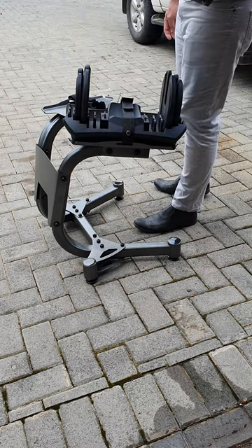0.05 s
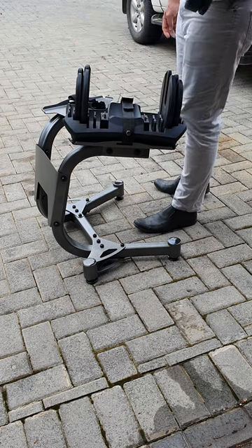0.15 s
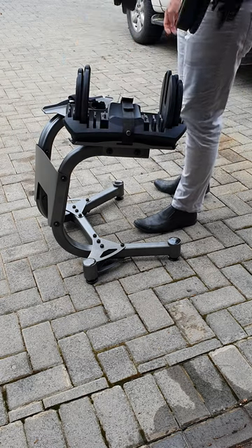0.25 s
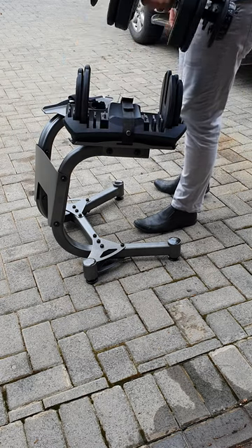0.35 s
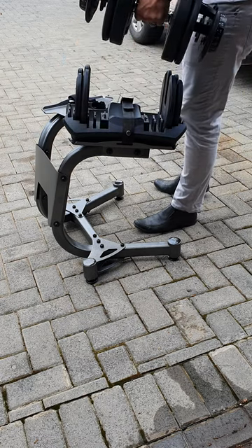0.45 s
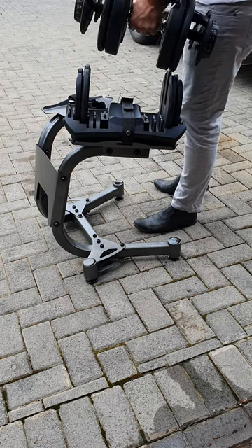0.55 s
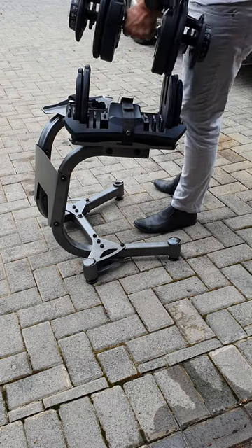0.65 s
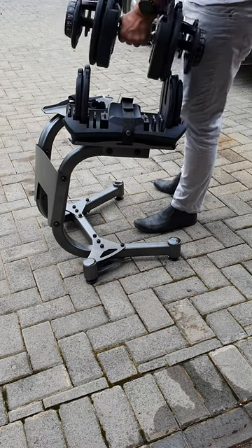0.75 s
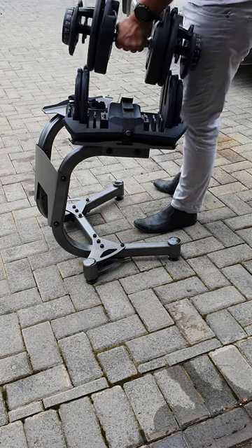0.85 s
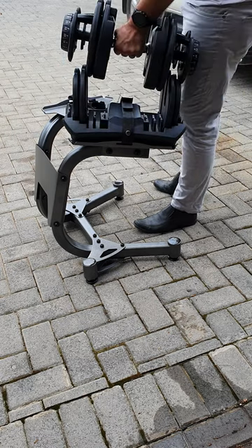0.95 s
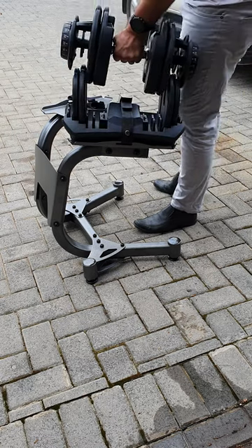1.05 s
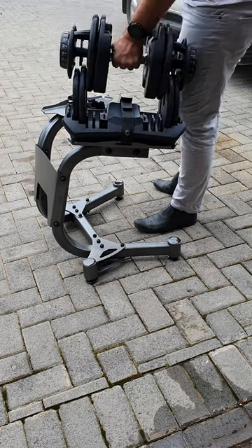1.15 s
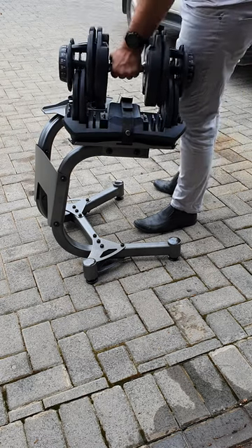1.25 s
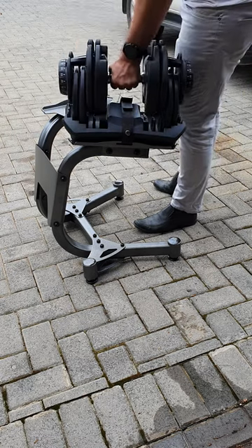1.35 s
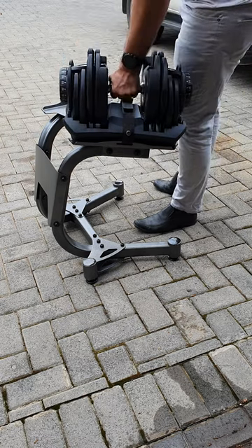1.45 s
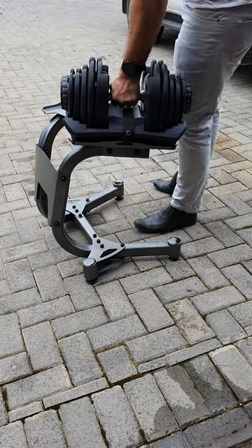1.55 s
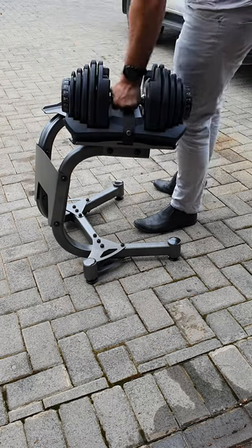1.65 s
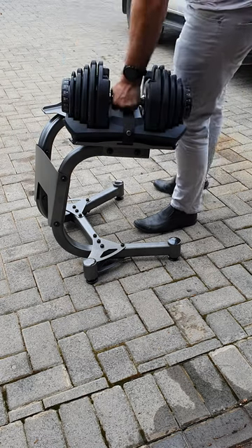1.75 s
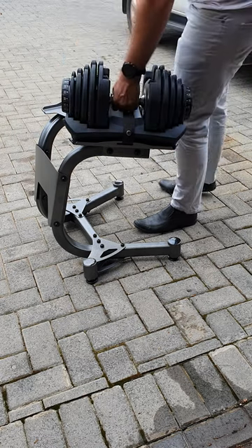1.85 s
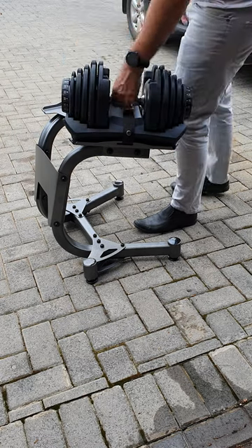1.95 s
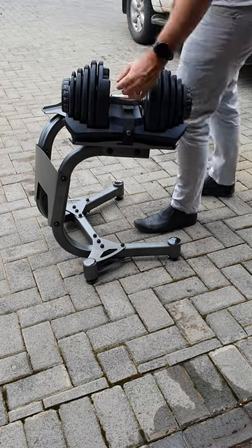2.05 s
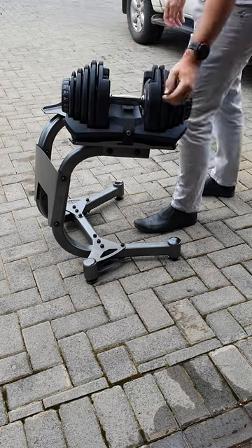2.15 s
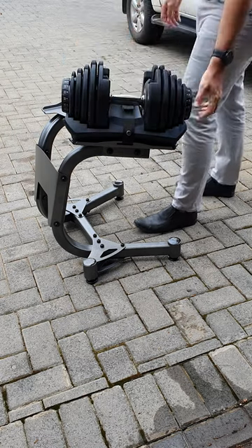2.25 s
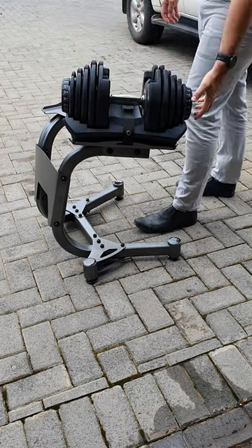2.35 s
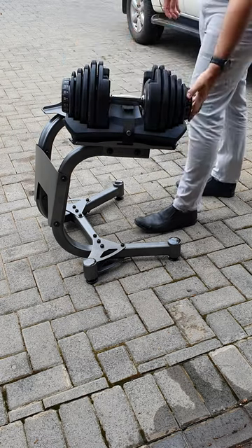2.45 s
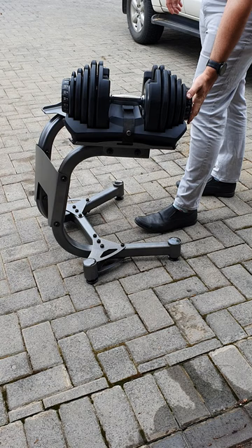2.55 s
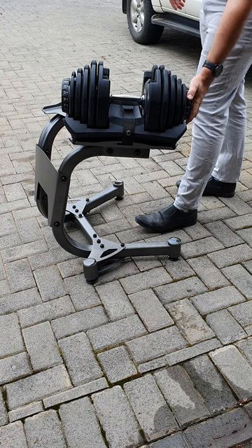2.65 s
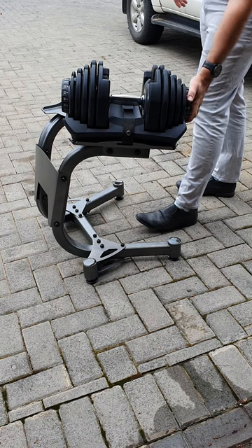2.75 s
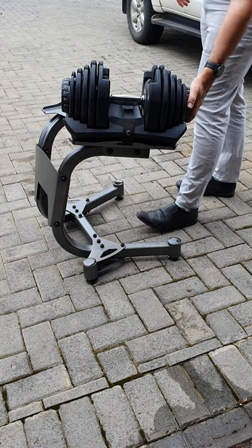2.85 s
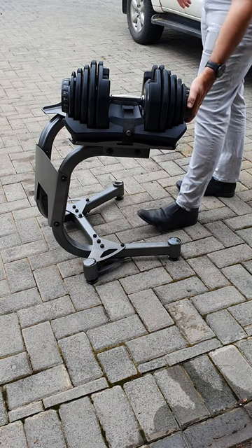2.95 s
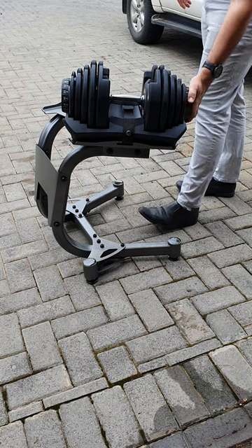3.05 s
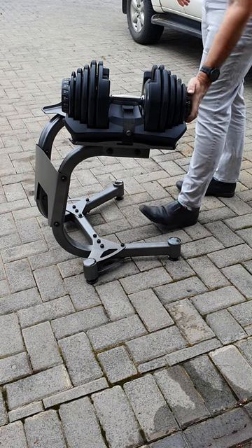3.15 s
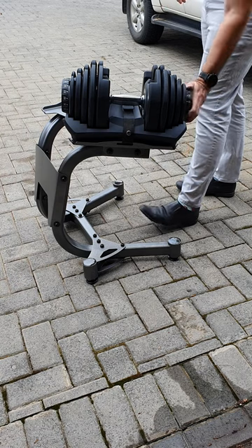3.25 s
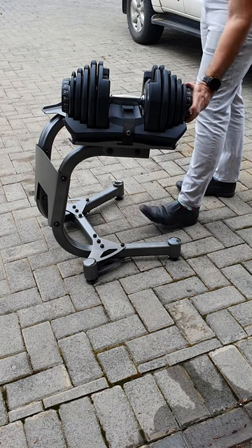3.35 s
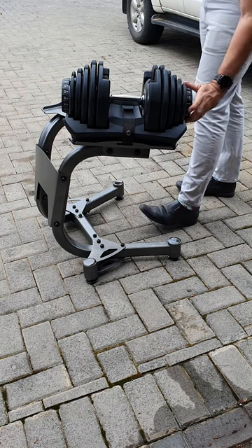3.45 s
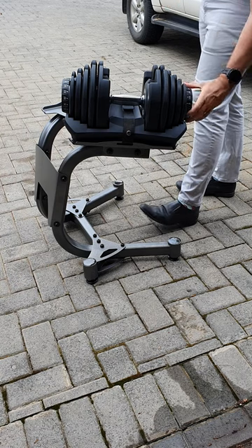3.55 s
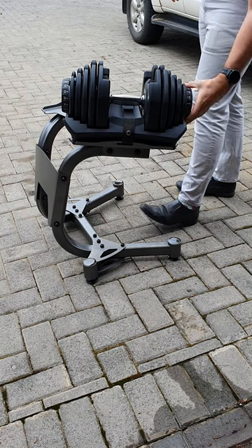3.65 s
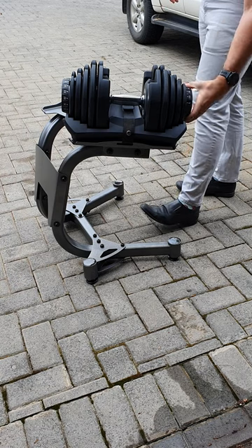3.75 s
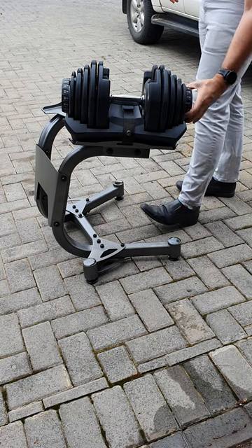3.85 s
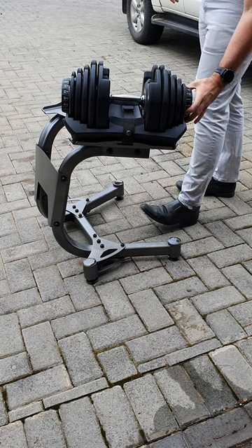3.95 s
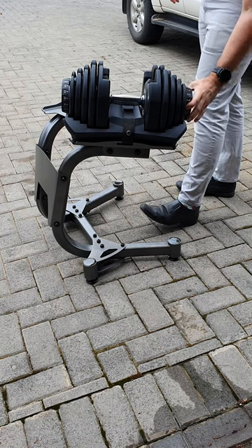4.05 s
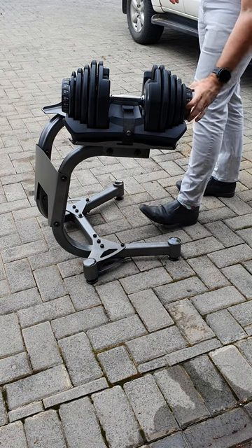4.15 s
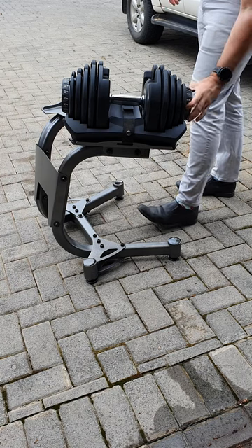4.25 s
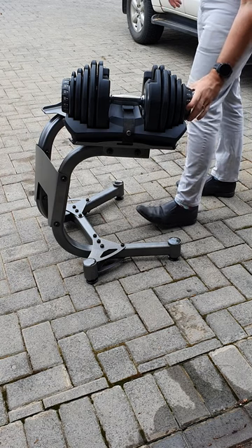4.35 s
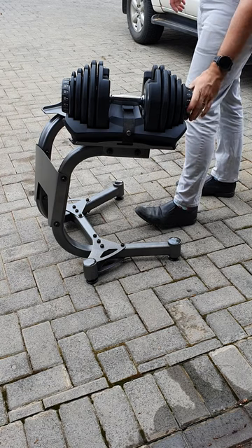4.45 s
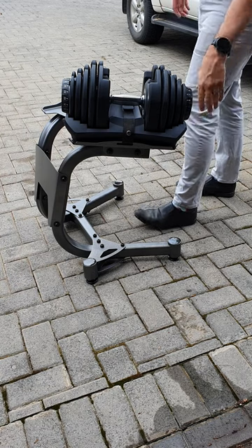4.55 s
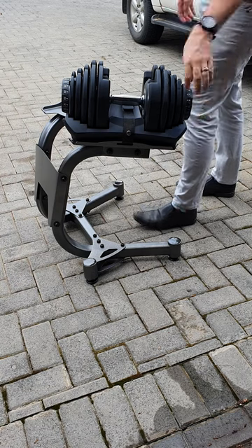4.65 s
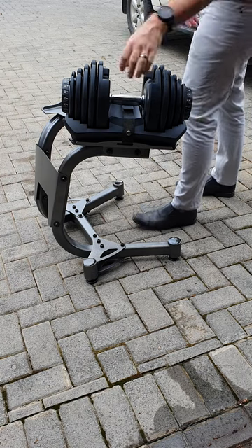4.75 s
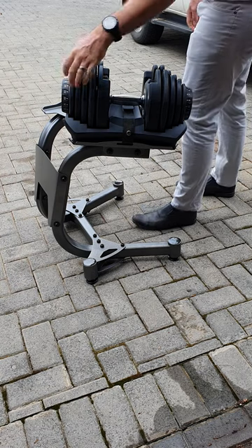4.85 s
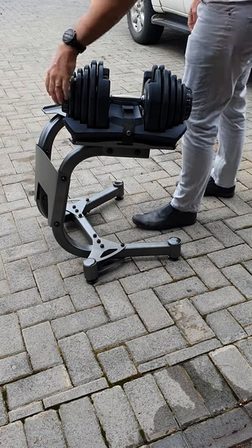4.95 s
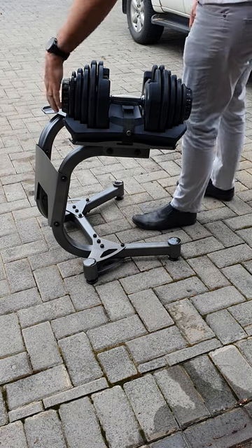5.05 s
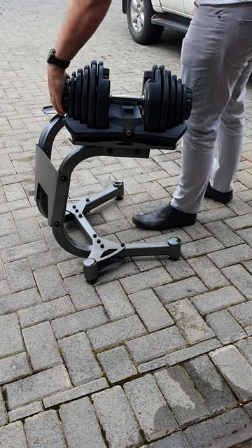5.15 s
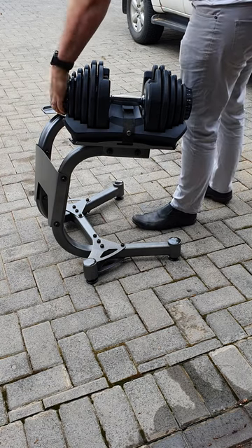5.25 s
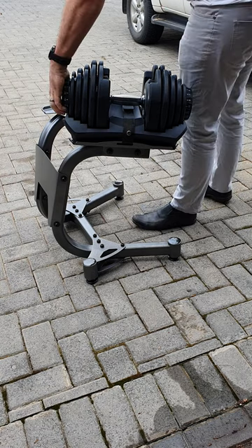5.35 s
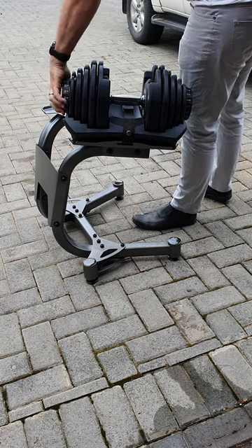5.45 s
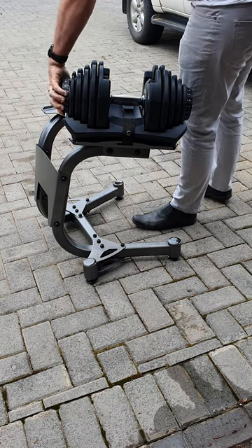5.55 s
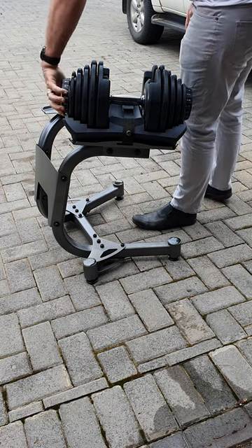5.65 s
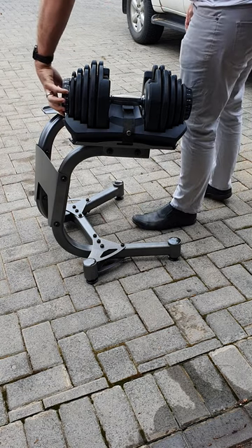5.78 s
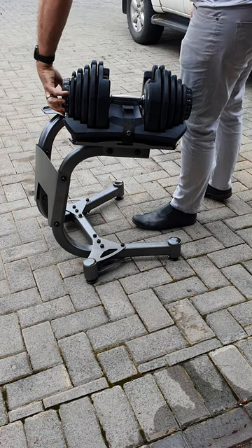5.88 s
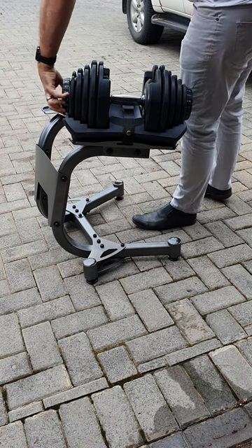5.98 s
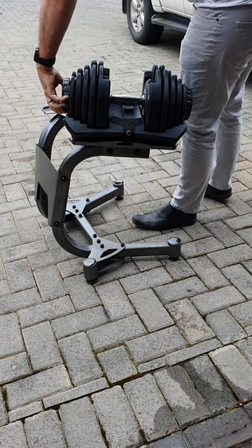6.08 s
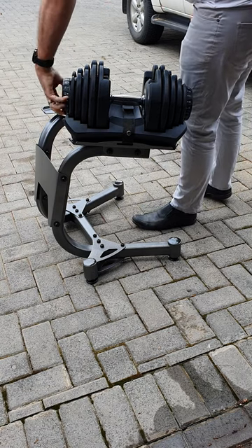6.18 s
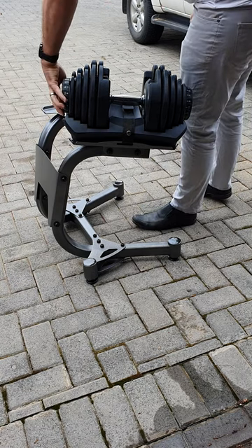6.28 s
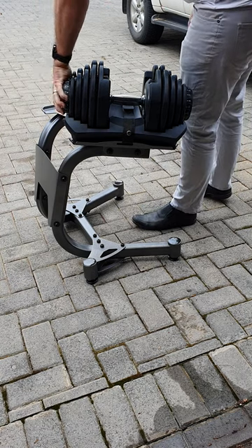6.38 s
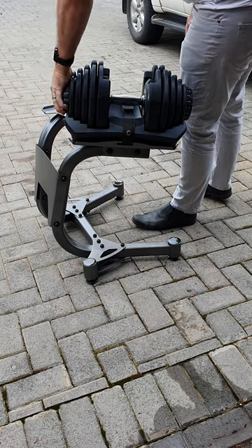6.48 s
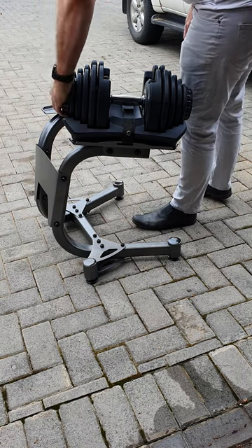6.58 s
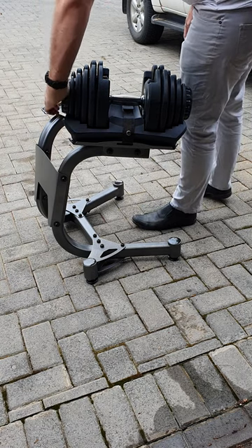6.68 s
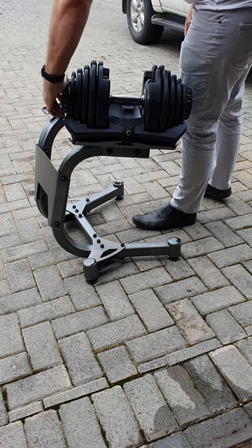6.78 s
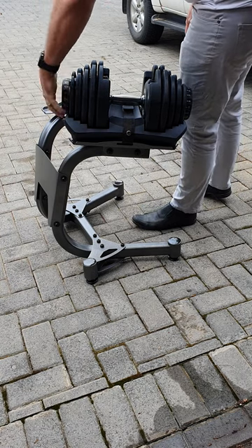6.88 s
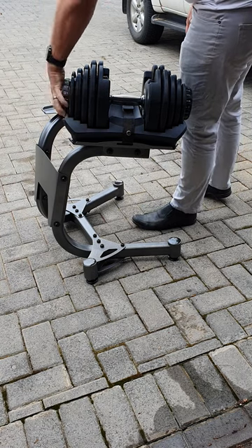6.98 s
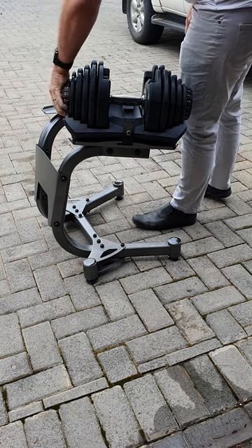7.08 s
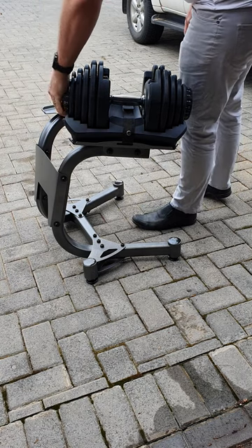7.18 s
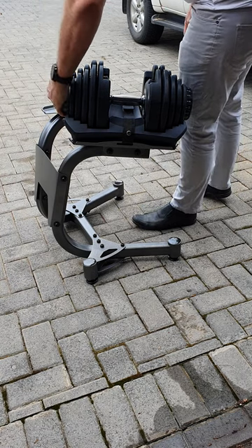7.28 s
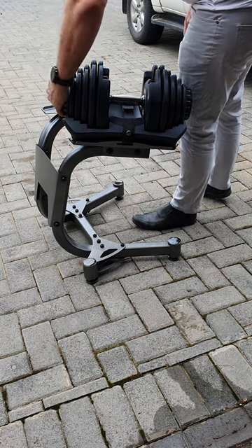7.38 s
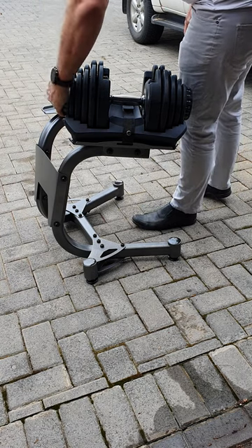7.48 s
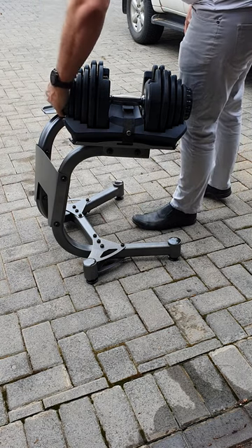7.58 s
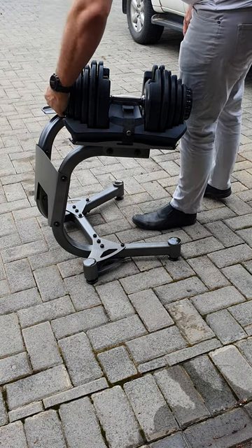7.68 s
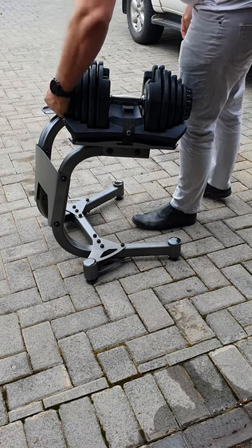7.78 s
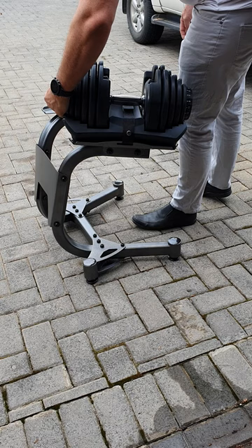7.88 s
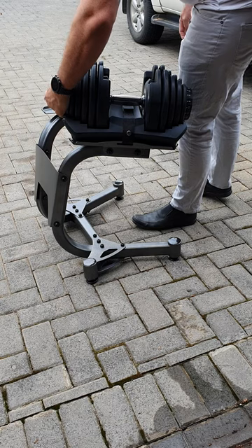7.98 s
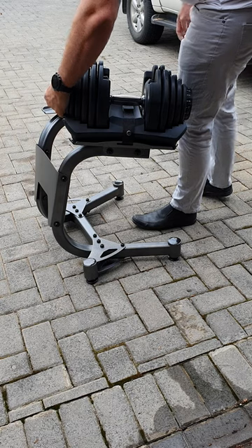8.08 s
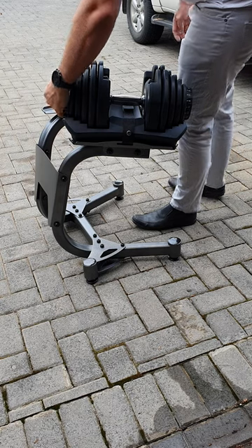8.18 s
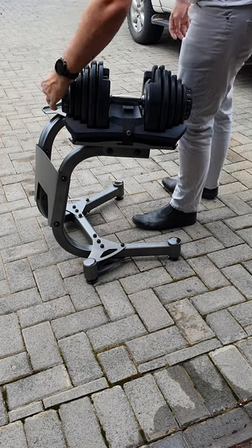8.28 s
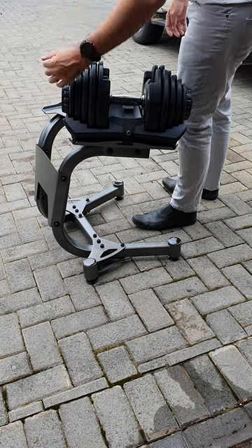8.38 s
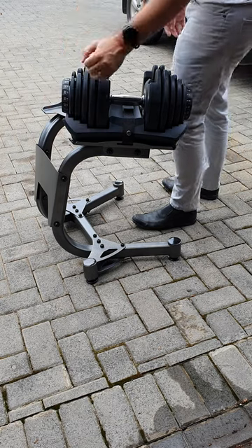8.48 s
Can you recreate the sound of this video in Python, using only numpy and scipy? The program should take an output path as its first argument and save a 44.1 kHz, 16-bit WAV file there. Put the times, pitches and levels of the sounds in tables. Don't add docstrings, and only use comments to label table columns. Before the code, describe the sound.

Outdoors in a paved yard, heavy steel plates touch, rattle, then crash into a tray with a dense clanging and a booming metal stand. Shoes scuff softly. A hand then turns a hollow plastic dial in light clicks, pauses, and turns the other with louder snaps and a brief squeak. Close stereo pickup, short wall reflections, faint city hiss and distant engine drone.

```python
import sys
import numpy as np
from scipy import signal
from scipy.fft import rfft, irfft
from scipy.io import wavfile
from scipy.ndimage import uniform_filter1d

SR = 44100
rng = np.random.default_rng(int(sys.argv[2]) if len(sys.argv) > 2 else 0)


def unload_wav(signal):
    wavfile.write(
        sys.argv[1],
        SR,
        np.round(np.clip(np.atleast_2d(signal).T, -1, 1) * 32767).astype(np.int16),
    )


def voltage_ratio(level):
    return 10 ** (np.asarray(level, float) / 20)


N = 375732
MIC_LAG = 14


def evened(x):
    return x / np.sqrt(np.mean(x ** 2) + 1e-20)


def read(points, hz):
    f, value = np.transpose(points)
    return np.interp(np.log(hz + 1), np.log(f + 1), value)


def add(mix, start_s, sound):
    part = mix[..., round(start_s * SR):][..., :sound.shape[-1]]
    part += sound[..., :part.shape[-1]]


def columns(rows):
    s, *controls = np.transpose(rows)
    t = np.arange(s[0], s[-1], 1 / SR)
    return s[0], [np.interp(t, s, c) for c in controls]


def drift(count, *smoothing):
    x = rng.standard_normal(count)
    for samples in smoothing:
        x = uniform_filter1d(x, samples)
    return evened(x)


def colour(x, spectrum):
    hz = np.fft.rfftfreq(len(x), 1 / SR)
    return evened(irfft(rfft(x) * voltage_ratio(read(spectrum, hz)), len(x)))


def resonate(x, hz, width_hz):
    turn = np.exp(2j * np.pi * np.cumsum(hz * np.ones(len(x))) / SR)
    r = np.exp(-np.pi * width_hz / SR)
    return evened((turn * signal.lfilter([1 - r], [1, -r], x / turn + 1e-18)).real)


def resonate_twice(x, hz, width_hz):
    return resonate(resonate(x, hz, width_hz), hz, width_hz)


def ring(modes, seconds, scatter_db=0., detune=0.):
    hz, db, t60 = np.transpose(modes)[:, :, None]
    luck = rng.standard_normal((2, len(modes), 1))
    t = (np.arange(int(seconds * SR)) / SR).astype("f")
    loss = (np.log(1000) / t60).astype("f")
    spin = (2 * np.pi * hz * (1 + detune * luck[1])).astype("f")
    x = voltage_ratio(db + scatter_db * luck[0])[:, 0] @ (np.exp(-loss * t) * np.sin(spin * t))
    return x / abs(x).max()


def softened(x, rise_s):
    return x * np.minimum(np.arange(len(x)) / SR / rise_s, 1)


def flutter(x, depth):
    return x * (1 + depth * drift(len(x), 120))


def grit(count, per_s, spread_db):
    size = voltage_ratio(spread_db * np.minimum(rng.exponential(1, count), 4))
    sign = rng.choice([-1, 1], count)
    return evened(size * sign * (rng.random(count) < per_s / SR))


def strokes(t, at, rise, hold, db, fall_db_per_s):
    coarse = t[::20]
    since = coarse - np.c_[at]
    rising_db = np.minimum(30 * since / np.c_[rise], 0)
    falling_db = fall_db_per_s * np.maximum(since - np.c_[hold], 0)
    level = voltage_ratio(np.c_[db] + rising_db - falling_db) * (since > -1.5 * np.c_[rise])
    return np.interp(t, coarse, level.sum(0))


def placed(x, spread_db=4.5, count=7):
    side = rng.uniform(-1, 1)
    return voltage_ratio([[spread_db * side], [-spread_db * side]]) * np.array([x, np.roll(x, round(count * side))])


# pitch_hz, level_db (per Hz)
PLATE_COLOUR = [(35, -43), (60, -27.5), (274, 1), (346, -9), (527, 2.5), (862, -5), (924, -2), (1510, 2),
                (1850, -10.5), (2840, -16.5), (4120, -19), (7400, -59), (13600, -49), (15000, -56.5),
                (15800, -80)]
# pitch_hz, t60_s
PLATE_T60 = [(80, .14), (500, 0.045), (2000, 0.035), (10000, 0.072)]


def plate_body():
    hz = 95 * (14500 / 95) ** (rng.random(300) ** 0.55)
    t60 = read(PLATE_T60, hz)
    db = read(PLATE_COLOUR, hz) + 3 * np.log2(hz / 1000) - 10 * np.log10(t60)
    modes = np.transpose([hz, db, t60])
    return ring(modes[hz < 2000], .2), ring(modes[hz >= 2000], 0.086)


# contact_s, rise_s, hold_s, low_level_db, treble_relative_db
RATTLE = [
    (0.839, .006, 0.039, -38, -8),
    (1.046, .05, .03, -67, 3.5),
    (1.2, 0.064, 0.0032, -43, -1.5),
    (1.281, 0.0091, 0.0046, -44, -3),
    (1.362, 0.017, 0.037, -54.5, 4.5),
    (1.414, .004, 0.015, -25, -12.5),
    (1.457, 0.032, .08, -29.5, -1.5),
    (1.585, 0.003, 0.0051, -19.5, -11.5),
    (1.603, 0.025, 0.02, -23.5, -1),
    (1.984, 0.041, 0.015, -64, 4.5),
]
RATTLE_SPAN_S = .8, 2.2
# start_s, peak_db, treble_relative_db
KNOCKS = [(0.842, -17, -24), (0.872, -20, -21.5), (1.152, -32.5, -18), (1.19, -34.5, -13.5),
          (1.2, -31, -13), (1.302, -33.5, -15), (1.323, -37, -17), (1.457, -10, -16), (1.48, -7.5, -16.5),
          (1.498, -13, -15), (1.518, -8.5, -16.5), (1.534, -10.5, -12.5), (1.553, -16, -13.5),
          (1.608, -8, -15.5), (1.632, -9, -16.5), (1.646, -14, -17.5), (1.659, -11, -17),
          (1.686, -14, -18.5), (1.717, -15.5, -17.5), (1.753, -20.5, -26.5), (1.799, -24.5, -41),
          (1.286, -44.5, -24), (1.365, -43, -17), (1.419, -15.5, -17), (1.438, -4.5, -29),
          (1.583, -1.5, -20), (1.599, -10.5, -19.5), (1.615, -10.5, -5.5), (1.853, -24, -25.5)]
# pitch_hz, level_db, t60_s
STAND = [(102, -13, 1), (279.6, -7.5, 0.63), (451.3, -10, 0.25), (622, -4, 0.2), (659.4, 1.5, 0.49),
         (695, 5, 0.5), (757, 0, 0.39), (784, -4.5, 0.76), (870, -6.5, 0.6), (1055, -21, 0.97)]


def dumbbell():
    out = np.zeros((2, N))
    t = np.arange(*RATTLE_SPAN_S, 1 / SR)
    at, rise, hold, low_db, treble_db = np.transpose(RATTLE)

    def shaking(db, fall_db_per_s, settle_fall_db_per_s):
        contact = strokes(t, at, rise, hold, db, fall_db_per_s)
        return contact + strokes(t, at, rise, hold, db - 11, settle_fall_db_per_s)

    deep = shaking(low_db, 278, 112)
    bright = shaking(low_db + treble_db, 341.5, 250)
    for _ in range(7):
        drive = grit(len(t), per_s=450, spread_db=2.8)
        low, high = (evened(signal.oaconvolve(drive, body)[:len(t)]) for body in plate_body())
        add(out, t[0], placed(voltage_ratio(-11.5) * deep * low, spread_db=0.3, count=4))
        add(out, t[0], placed(voltage_ratio(-14.5) * bright * high))
    for s, peak_db, knock_treble_db in KNOCKS:
        low, high = plate_body()
        add(out, s, voltage_ratio(peak_db - 0.5) * softened(low, rise_s=0.00075)[None])
        add(out, s, placed(voltage_ratio(peak_db + knock_treble_db - 2.5) * high))
    stand = ring(STAND, 1.5)
    hum = signal.oaconvolve(out, stand[None] / np.linalg.norm(stand), axes=1)[:, :N]
    out += voltage_ratio(-21.5) * hum * (1 + 0.75 * drift(N, 300))
    return out * voltage_ratio([[-.3], [.3]])


# start_s, level_db
TRAY_BLOWS = [
    (1.42, -28.5),
    (1.52, -28),
    (1.586, -20.5),
    (1.62, -20.5),
    (1.72, -26),
    (1.752, -29.5),
    (1.8, -29.5),
    (1.851, -35),
]
# pitch_hz, level_db, t60_s
TRAY = [(304, -9, 0.17), (374.3, -8, 0.23), (441, -6.5, .2), (527, -3.5, .33), (566, -2.5, 0.27),
        (617, 0.5, .36), (637, -1.5, .36), (721, 2, .4), (791, -2, .3), (883, -3.5, 0.28), (1080, -5.5, .2),
        (1314, -10.5, .2), (1597, -9.5, 0.29)]


def tray_booms(near):
    for s, db in TRAY_BLOWS:
        boom = flutter(ring(TRAY, .7, scatter_db=4.5, detune=.012), depth=.6)
        add(near, s, voltage_ratio(db) * placed(softened(boom, rise_s=.004), spread_db=1.0, count=2))


# start_s, pitch_hz, level_db, t60_s
THUDS = [
    (0.845, 193, -38.5, 0.27),
    (0.85, 129.6, -44, 0.22),
    (1.155, 444, -50, .15),
    (1.201, 442, -45, .2),
    (1.29, 454, -47, .2),
    (1.417, 100, -36, .4),
    (1.584, 270, -25, .12),
    (1.598, 102, -40, 0.7),
    (4.55, 149.5, -61, 0.47),
]


def thuds(near):
    for s, hz, db, t60 in THUDS:
        thud = flutter(ring([(hz, db, t60)], .5), depth=0.14)
        add(near, s, voltage_ratio(db) * softened(thud, rise_s=0.0036)[None])


LEG_HUM = 1.7, 1007, -69, 4.5


def leg_hum(far):
    start, *mode = LEG_HUM
    add(far, start, voltage_ratio(mode[1]) * flutter(ring([mode], 1.2), depth=.2)[None])


# pitch_hz, level_db (per Hz)
CRACK = [(240, -37), (400, -20.5), (1550, -6), (1930, -12.5), (4130, 2.5), (8060, -14), (10300, -12.5),
         (14100, -21.5), (16500, -40)]
# pitch_hz, level_db, t60_s
SHELL = [(1080, -15.5, 0.12), (1546, -22.5, 0.12), (2310, -20.5, 0.037), (2500, -15, 0.21),
         (3630, 0, 0.0069), (3800, -14.5, 0.014), (3904, 3.5, 0.032), (5700, -29, 0.028)]
# pitch_hz, level_db, t60_s
PIN_LOW = [(10480, 4, .13), (10480, -1.5, 0.09), (10350, -2, 0.072), (10760, -10.5, .05), (10800, -6, 0.03),
           (6840, -2.5, 0.086)]
PIN_HIGH = [(13900, -3, .1), (14070, 7.5, .17), (14040, 3, .12), (14335, 1, .04), (15600, -10, .04)]


def snap(peak_db, low_db, high_db):
    t = np.arange(int(.2 * SR)) / SR
    shared, left, right = (colour(v, CRACK) for v in rng.standard_normal((3, len(t))))
    noise = shared + 0.56 * np.array([left, right])
    dull = evened(signal.lfilter([1, 2, 1], [1, -.3], noise))
    crack = np.exp(-t / 0.0018) * noise + 0.072 * np.exp(-t / 0.033) * dull
    out = np.zeros((2, int(.3 * SR)))
    add(out, 0, voltage_ratio(-3.5) * crack * np.minimum(t / .0003, 1))
    add(out, 0, voltage_ratio(-2) * ring(SHELL, 0.18, scatter_db=2.5, detune=0.02)[None])
    for db, pin, lean_db in ((low_db + 3.5, PIN_LOW, .4), (high_db + 5.5, PIN_HIGH, 2.5)):
        tone = ring(pin, .3, scatter_db=2.5, detune=0.0026)
        pair = np.array([flutter(tone, depth=0.22), flutter(tone, depth=0.96)])
        out += voltage_ratio([[db + lean_db], [db - lean_db]]) * pair
    return voltage_ratio(peak_db + 2.0) * out


# start_s, peak_db, lower_pin_relative_db, upper_pin_relative_db, pan_db
SNAPS = [(2.8254, -33, -12.5, -19.5, 3), (2.8462, -38.5, -11, -28, 1), (3.0911, -32, -2.5, -6.5, 4),
         (3.1887, -28.5, -7, -21, 6.5), (3.2755, -32.5, -4, -16.5, 3), (3.7874, -41.5, -10, -14.5, 4),
         (3.8871, -25.5, -10.5, -19, 5.5), (4.0459, -30.5, -3, -9, 1.5), (5.3716, -28, -5, -12.5, 0),
         (5.448, -37.5, -22, -14, 8.5), (5.5342, -38, -22, -32, 1), (5.8285, -64.5, -11, -27, 12),
         (6.496, -23.5, -15, -26.5, 7.5), (6.5351, -22, -9, -14.5, 2), (6.5636, -20, -13, -22.5, -1),
         (6.6795, -27, -8, -15, 2), (7.1499, -31.5, -4, -10, 5), (7.2116, -18.5, -13, -27.5, 1),
         (7.2972, -23.5, -17, -22.5, -0.5), (7.7312, -27.5, -16.5, -22, 5), (7.7617, -30.5, -22, -27, -5)]


def detents(near):
    for s, peak_db, low_db, high_db, pan_db in SNAPS:
        add(near, s, voltage_ratio([[pan_db / 2], [-pan_db / 2]]) * snap(peak_db, low_db, high_db))


# start_s, hold_s, level_db, upper_resonances_relative_db
TURNS = [(2.761, 0.027, -56.5, -4), (2.828, 0.015, -58.5, 3), (3.005, 0.042, -51, -10),
         (3.086, 0.022, -47.5, 5.5), (3.2, 0.018, -48.5, 3.5), (3.277, 0.0096, -45, -4),
         (3.796, 0.058, -53.5, 1.5), (3.896, 0.12, -62, 3), (4.046, 0.014, -52, -15),
         (5.302, 0.026, -56.5, -8), (5.385, 0.023, -50, 0.5), (5.462, 0.026, -50, 2.5),
         (5.535, 0.012, -58, -4), (5.836, 0.026, -55.5, -6), (6.02, 0.028, -54, -11.5),
         (6.379, 0.03, -44.5, -19.5), (6.449, 0.037, -39.5, -6.5), (6.536, 0.049, -35.5, -3),
         (6.67, 0.0083, -52, 3.5), (6.785, 0.032, -42.5, -15), (7.12, 0.12, -41.5, -3.5),
         (7.222, 0.0077, -43.5, 0.5), (7.31, 0.011, -73, -11), (7.62, 0.043, -65.5, -7.5),
         (7.757, 0.014, -51, -6)]
TURN_SPAN_S = 2.7, 8.1
# pitch_hz, width_hz, level_db
GRIND_LOW = [(579, 257, 4), (664, 85, 1), (367, 370, -11)]
GRIND_MID = [(1540, 370, 6.5), (1110, 260, 1), (2055, 340, -3), (3580, 830, -2.5), (1340, 1200, -7.5),
             (4200, 720, -12)]
GRIND_TOP = [(2570, 420, -1)]


def dials(near):
    t = np.arange(*TURN_SPAN_S, 1 / SR)
    at, hold, level_db, mid_db = np.transpose(TURNS)
    drive = grit(len(t), per_s=1500, spread_db=4.3)
    flex = 1 + 0.023 * drift(len(t), 2500, 2500)

    def body(group):
        return evened(sum(voltage_ratio(db) * resonate_twice(drive, hz * flex, width) for hz, width, db in group))

    def push(db):
        rise_s = np.full_like(at, 0.081)
        return strokes(t, at, rise_s, hold, db - 6, fall_db_per_s=265.5)

    upper = body(GRIND_MID) + voltage_ratio(-8.5) * body(GRIND_TOP)
    grind = push(level_db) * body(GRIND_LOW) + push(level_db + mid_db) * upper
    add(near, t[0], grind[None])


# start_s, peak_db, lowest_pitch_hz, overtone_relative_db
BUMPS = [(0.599, -67, 330, 4.5), (2.752, -45, 646, -13), (3.0, -41, 454, -5.5), (3.789, -47, 670, -32.5),
         (5.29, -61.5, 673, -16.5), (5.83, -43, 614, -4), (6.014, -36.5, 380, -9.5),
         (6.339, -46.5, 660, -4.5), (6.361, -39.5, 608, -8), (6.419, -28, 560, -7),
         (6.787, -35, 690, -11.5), (6.811, -33.5, 680, -7.5), (7.087, -49, 610, -3.5),
         (7.107, -28.5, 675, -11.5), (8.156, -53, 689, -3.5), (8.44, -53.5, 620, -5)]


def bumps(near):
    overtones = [(1496, -5.5, 0.073), (1570, 1.5, 0.061), (1060, -9.0, 0.058), (2300, -12.5, .03)]  # Hz, dB, t60 s
    for s, peak_db, hz, over_db in BUMPS:
        boom = ring([(hz, 0, .08), (1.25 * hz, -5, .06), (700, -4, .1)], .2, scatter_db=-1.0)
        over = ring(overtones, .2, scatter_db=-1.5, detune=0.024)
        t = np.arange(len(boom)) / SR
        puff = resonate(resonate(rng.standard_normal(len(t)), 600, 1000), 680, 1800) * np.exp(-t / 0.011)
        onset = np.sin(np.pi / 2 * np.minimum(t / 0.00071, 1)) ** 2
        blow = boom + voltage_ratio(over_db + 3.5) * (over + 0.42 * puff)
        add(near, s, (voltage_ratio(peak_db - 2.0) * blow * onset)[None])


# start_s, level_db
SPRING_PLUCKS = [(3.025, -49.5), (3.101, -44), (3.29, -55.5), (3.899, -58), (4.053, -59.5), (5.62, -64),
                 (6.499, -47.5), (6.578, -37.5), (6.681, -57), (7.219, -50), (7.765, -51.5)]
# pitch_hz, level_db, t60_s
SPRING = [(2548, 5, 0.43), (2540, -2, .2)]


def detent_spring(near):
    for s, db in SPRING_PLUCKS:
        add(near, s, voltage_ratio(db) * flutter(ring(SPRING, 0.68, scatter_db=2.0), depth=0.25)[None])


# start_s, level_db
ROD_BLOWS = [
    (3.277, -56.5),
    (3.888, -49),
    (4.047, -47),
    (5.369, -46),
]
# pitch_hz, level_db, t60_s
ROD = [(4362, 0, 0.8), (4385, -9, .4), (6546, -8, 0.4)]


def locking_rod(near):
    for s, db in ROD_BLOWS:
        add(near, s, voltage_ratio(db) * flutter(ring(ROD, 0.87), depth=0.27)[None])


# start_s, pitch_hz, level_db
SQUEAK = [
    (6.505, 1820, -52.5),
    (6.517, 1697, -30),
    (6.545, 1504, -28.5),
    (6.57, 1720, -52),
]
SQUEAL = [
    (1.09, 1956, -78),
    (1.11, 2118, -66),
    (1.174, 2180, -62.5),
    (1.2, 2170, -63),
]
CREAK = [
    (2.2, 870, -82),
    (2.25, 910, -69),
    (2.32, 960, -88),
]
CHIRP = [
    (7.235, 2300, -50),
    (7.27, 2497, -49),
    (7.32, 2805, -69),
]


def squeaks(near):
    for rows, rough in ((SQUEAK, 0.22), (SQUEAL, 1.4), (CREAK, 0.38), (CHIRP, 2.6)):
        start, (hz, level_db) = columns(rows)
        tone = np.sin(2 * np.pi * np.cumsum(hz) / SR)
        tone += rough * resonate_twice(rng.standard_normal(len(hz)), hz, 200)
        add(near, start, (voltage_ratio(level_db + 0.5) * tone * signal.windows.tukey(len(hz), .3))[None])


# contact_s, rise_s, hold_s, level_db
RUSTLES = [
    (1.19, .004, 0.025, -63),
    (1.29, .02, 0.075, -65.5),
    (2.0, 0.016, 0.032, -75.5),
    (2.3, 0.13, 0.37, -85.5),
    (2.79, 0.042, .03, -84),
    (4.99, .04, 0.09, -80),
    (5.16, .03, 0.037, -87),
    (5.31, 0.018, .05, -79.5),
    (8.17, .02, 0.037, -88),
]
# pitch_hz, level_db (per Hz)
RUSTLE_COLOUR = [(800, -29.5), (1680, -2.5), (2200, -6.5), (5800, 1), (9000, -9.5), (12000, -7),
                 (16000, -20)]


def rustle():
    t = np.arange(N) / SR
    hiss = np.array([colour(grit(N, per_s=4100, spread_db=2.0), RUSTLE_COLOUR) for _ in range(2)])
    return strokes(t, *np.transpose(RUSTLES), fall_db_per_s=250.5) * hiss


# start_s, length_s, level_db, whistle_relative_db, first_whistle_hz
SCUFFS = [(1.931, 0.22, -72.5, 2.5, 2760), (2.16, 0.31, -71, 1, 2725), (2.423, 0.35, -76.5, 8, 2787),
          (2.724, 0.098, -70, -5, 2300), (4.151, 0.13, -78.5, -10, 3115), (4.259, 0.21, -81, -11, 2535),
          (4.931, 0.25, -78, -3, 1750), (6.038, 0.46, -86.5, -2, 3100), (7.571, .17, -77.5, -4, 2855),
          (8.124, 0.17, -76, -6, 2823), (8.378, 0.26, -70, -4.5, 2850)]
# pitch_hz, level_db (per Hz)
SCUFF_COLOUR = [(240, -42.5), (400, -18), (1010, -10), (1140, -18.5), (1580, -6.5), (1910, -19),
                (2670, -12), (3100, -19), (10000, -43.5), (13000, -68)]


def scuffs(near):
    t = np.arange(SR // 2) / SR
    for start, length, level_db, whistle_db, first_hz in SCUFFS:
        hz = first_hz - 450 * t + 35 * np.sin(2 * np.pi * (4.5 * t + rng.random()))
        rub = colour(grit(len(t), per_s=3300, spread_db=1.0), SCUFF_COLOUR)
        noise = rng.standard_normal(len(t))
        whistle = resonate_twice(noise, hz, 130) + 0.29 * resonate_twice(noise, 1.27 * hz, 120)
        swell = np.sin(np.pi * np.clip(t / length, 0, 1) ** .7)
        add(near, start, (voltage_ratio(level_db) * (rub + voltage_ratio(whistle_db) * whistle) * swell)[None])


# pitch_hz, t60_s
YARD_T60 = [(100, 0.29), (300, 0.4), (680, 0.36), (1400, 0.33), (4000, 0.3), (10000, 0.25), (15000, 0.024)]
# delay_s, level_db
ECHOES = [
    (.004, -5),
    (.0065, -8),
    (0.011, -12.5),
    (.021, -12),
]


def tail():
    taps = np.zeros((2, SR))
    at = np.arange(250, SR - 20, 20) + rng.integers(0, 20, (2, (SR - 251) // 20))
    np.put_along_axis(taps, at, rng.choice([-1., 1.], at.shape), 1)
    hz, t, z = signal.stft(taps, SR, nperseg=256)
    z[1] += (z[0] - z[1]) * np.exp(-hz / 400)[:, None]
    out = signal.istft(z * voltage_ratio(-60 * t / read(YARD_T60, hz)[:, None]), SR, nperseg=256)[1]
    out = voltage_ratio(-4.5) * out / np.linalg.norm(out[0])
    for s, db in ECHOES:
        out[[0, 1], int(s * SR) + rng.integers(0, 30, 2)] += voltage_ratio(db)
    return out


def yard(x):
    angle = np.pi * 2.5 * np.arange(N) / SR
    wet = np.zeros((2, N))
    for k in range(3):
        share = np.sqrt(2 / 3) * np.cos(angle + k * np.pi / 3)
        wet += signal.fftconvolve(x * share, tail(), axes=1)[:, :N]
    return wet


# time_s, lower_level_db, upper_level_db
RUMBLE = [(0.0, -62.5, -68), (0.45, -52, -80), (0.55, -54, -67), (1.11, -58.5, -59), (1.92, -73.5, -61),
          (2.25, -67, -77), (2.87, -66, -67.5), (3.49, -64, -59.5), (3.98, -59, -62.5), (4.67, -63.5, -59),
          (5.34, -75, -57.5), (5.55, -62, -55), (6.31, -69.5, -62.5), (7.19, -59.5, -63),
          (7.66, -89, -68.5), (8.02, -69.5, -62.5), (8.52, -77.5, -74.5)]
RUMBLE_HZ = 47, 71.3


def rumble():
    _, levels_db = columns(RUMBLE)
    drone = 0
    for db, hz, width in zip(levels_db, RUMBLE_HZ, (17, 7)):
        drone = drone + voltage_ratio(db) * resonate(resonate(rng.standard_normal(len(db)), hz, width), hz, 49)
    return voltage_ratio([[1.5], [3.5]]) * np.array([drone, np.roll(drone, MIC_LAG)])


# pitch_hz, level_db (per Hz)
AIR = [(20, -17), (49, -6), (84, -3), (147, -14), (404, -24.5), (966, -34.5), (1510, -32.5), (2060, -41),
       (4280, -41), (7300, -56.5), (13200, -50), (15200, -52.5), (16500, -66)]
# pitch_hz, likeness (0 to 1)
AIR_SAME = [(30, 1), (150, 0.58), (400, 0.23), (1500, 0.28), (9000, 0.04)]


def air():
    frames, hz = N // 512 + 5, np.fft.rfftfreq(2048, 1 / SR)
    a, b, c, d, patches = rng.standard_normal((frames, 1025, 5)).T
    patches = evened(uniform_filter1d(uniform_filter1d(patches, 20, 0), 8, 1))
    same = np.clip(read(AIR_SAME, hz), 0, 1)[:, None]
    left = a + 1j * b
    right = same * left + np.sqrt(1 - same ** 2) * (c + 1j * d)
    z = np.array([left, right]) * voltage_ratio(read(AIR, hz)[:, None] + 2.3 * patches)
    return voltage_ratio(-62.5) * evened(signal.istft(z, nperseg=2048, noverlap=1536)[1][:, :N])


# start_s, end_s
FAR_SPANS_S = [
    (1.578, 2.7),
    (6.49, 8.0),
]
# pitch_hz, level_db
MIC = [(20, -33.5), (60, -8), (120, 0), (8000, -0.5), (14600, -1), (16600, -13.5)]


def scene():
    near, far = np.zeros((2, 2, N))
    near += dumbbell() + rustle()
    for source in (tray_booms, thuds, detents, dials, bumps, detent_spring, locking_rod, squeaks, scuffs):
        source(near)
    at_far_end = np.searchsorted(np.ravel(FAR_SPANS_S) * SR, np.arange(N)) % 2 == 1
    near[1] = np.where(at_far_end, np.roll(near[1], 23), np.roll(near[1], MIC_LAG))
    near = np.roll(near, -7, axis=1)
    response = voltage_ratio(read(MIC, np.fft.rfftfreq(N, 1 / SR)))
    near = irfft(rfft(near + yard(near)) * response, N)
    leg_hum(far)
    far += air()
    add(far, 0, rumble())
    return near + far


def low_pass(x):
    return signal.sosfilt(signal.butter(12, 16820, fs=SR, output="sos"), x)


def record(dry):
    ceiling, edge_hz = 2.5, 16700
    limited = ceiling * np.tanh(dry / ceiling)
    mix = signal.oaconvolve(limited, signal.firwin(255, edge_hz, fs=SR)[None], "same")
    return low_pass(mix)


dry = scene()
out = record(dry)
unload_wav(out)
```